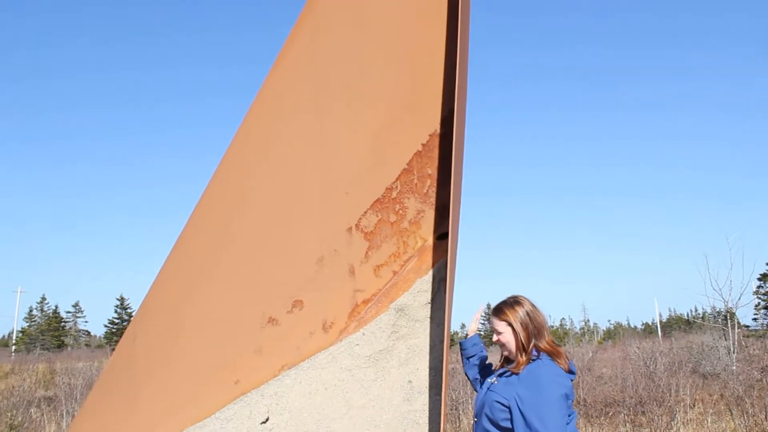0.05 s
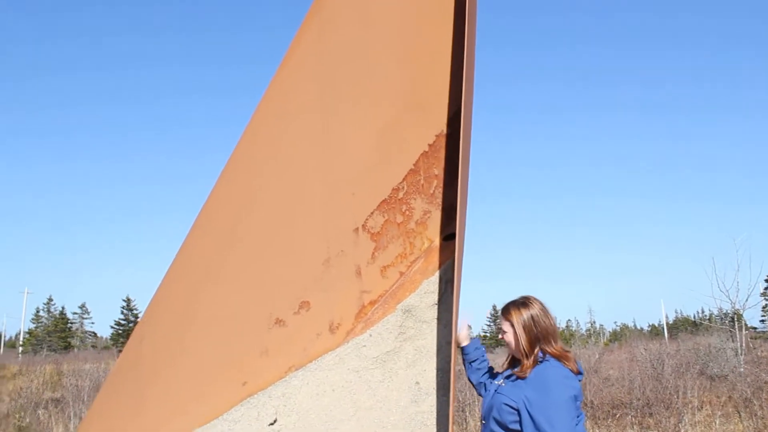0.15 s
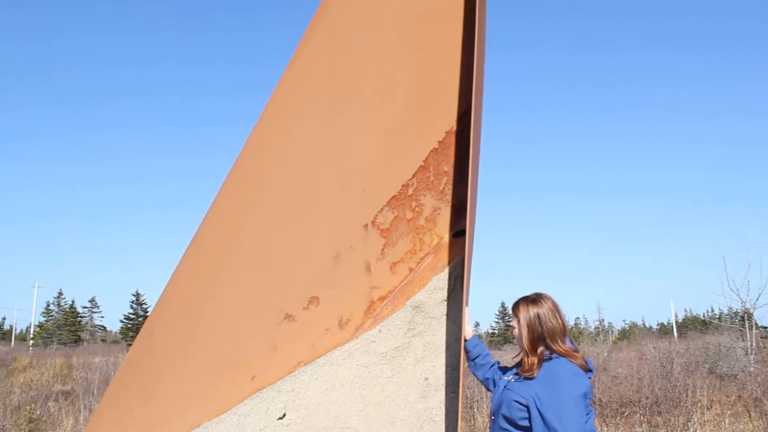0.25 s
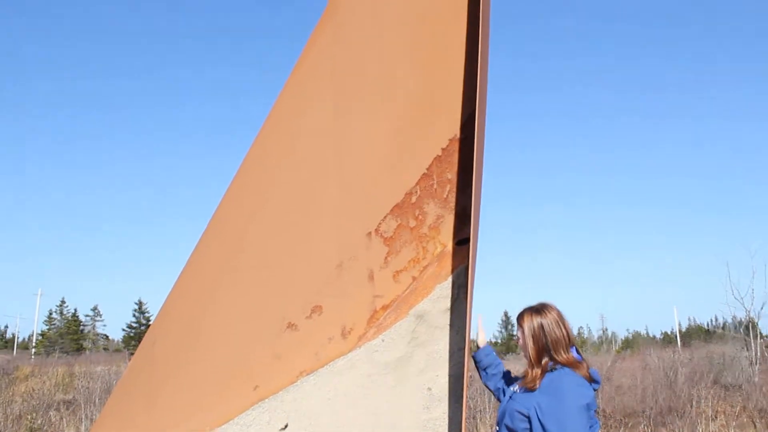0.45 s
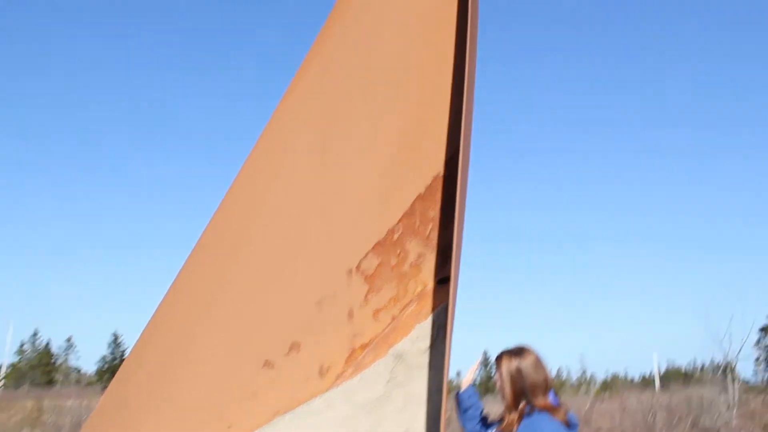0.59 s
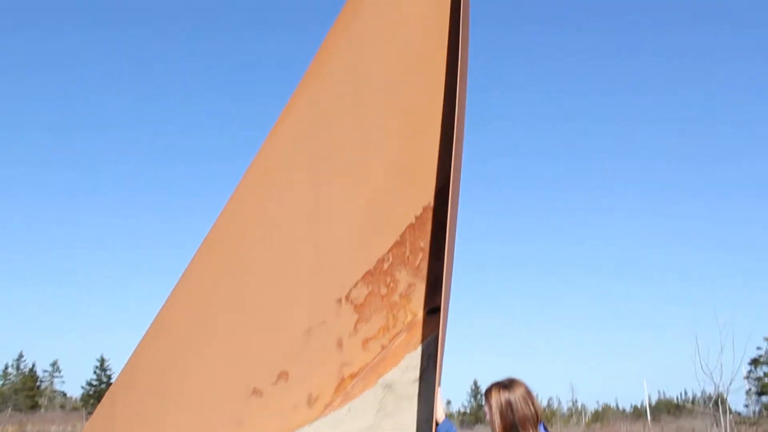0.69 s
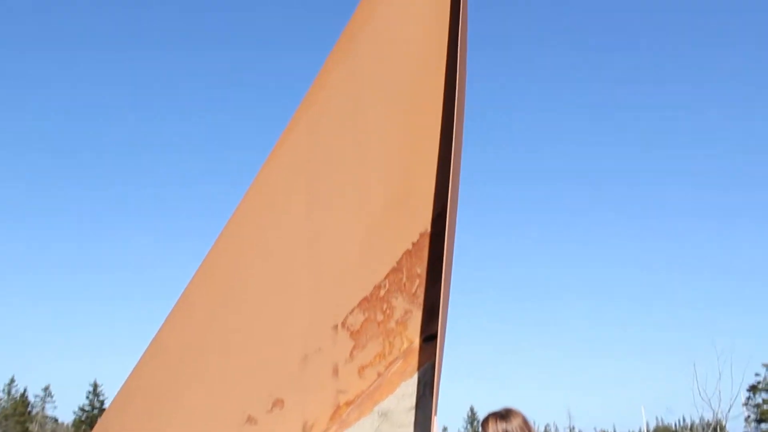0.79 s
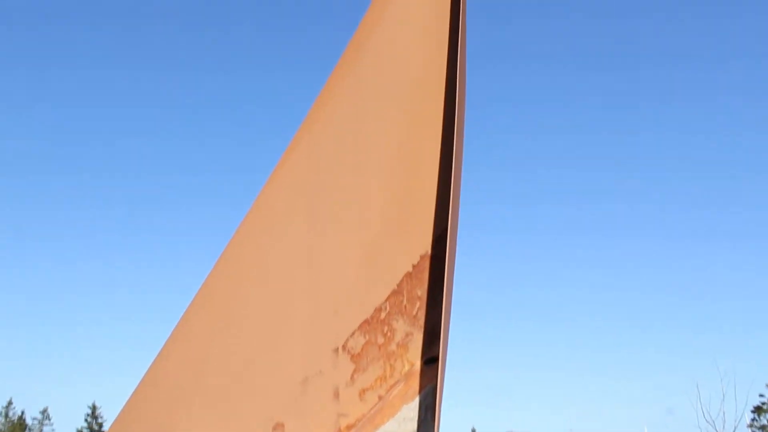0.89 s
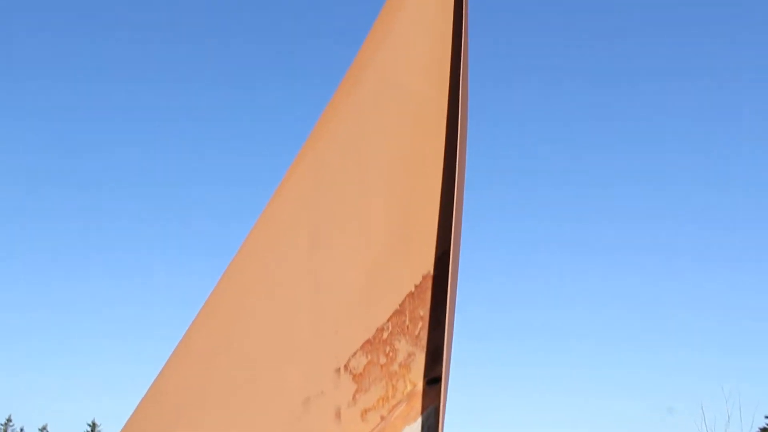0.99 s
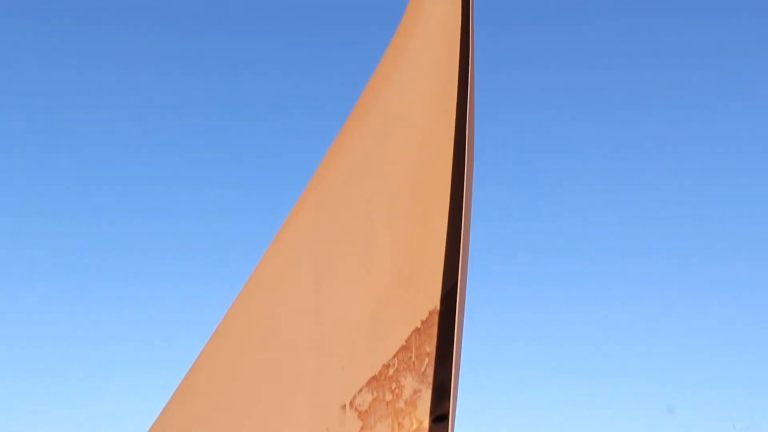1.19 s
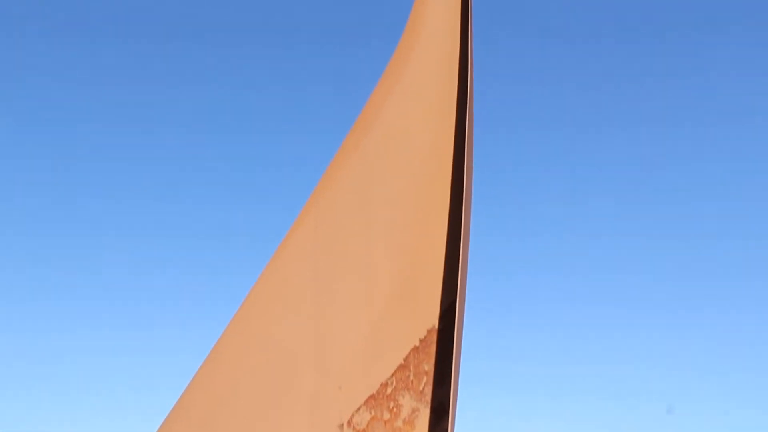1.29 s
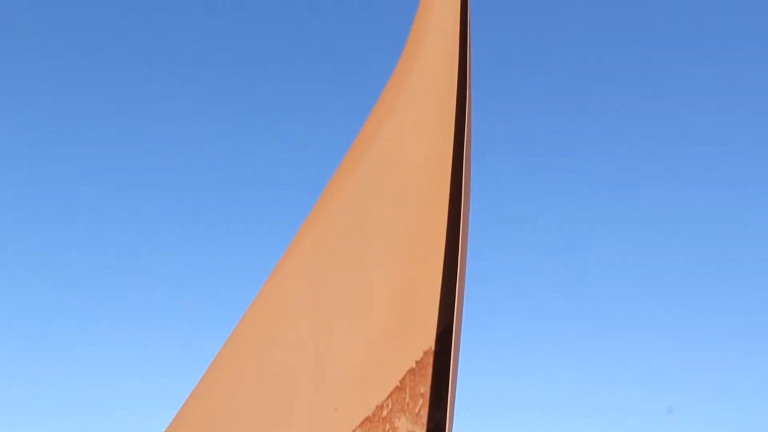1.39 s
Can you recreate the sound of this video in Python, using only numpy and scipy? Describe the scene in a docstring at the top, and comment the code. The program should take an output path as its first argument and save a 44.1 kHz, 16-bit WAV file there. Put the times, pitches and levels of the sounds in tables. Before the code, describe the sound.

A hand knocks three times, evenly, on a tall steel sculpture in an open field. Each close, hard clack is followed by a quick falling pew and a low ring that carries into the next knock, over faint wind.

```python
"""Knocks on a steel sculpture

A hand knocks three times on a tall steel plate in an open field. Each impact is a hard clack,
then a falling 'pew': bending waves are dispersive, so they cross the plate and return treble first.
Later returns blur into a low ring that lasts from knock to knock, over faint wind and hiss."""
import sys
import numpy as np
from scipy import signal
from scipy.fft import rfft, irfft, next_fast_len
from scipy.io import wavfile
from scipy.ndimage import uniform_filter1d

SR = 44100
rng = np.random.default_rng(int(sys.argv[2]) if len(sys.argv) > 2 else 0)


def wrap_up_sound(samples):
    """Save the sound to the file named by the first command line argument, as 16-bit audio."""
    columns = np.atleast_2d(samples).T
    # keep every value between -1 and 1, then stretch to whole-number steps
    tamed = np.clip(columns, -1, 1)
    steps = np.round(tamed * 32767).astype(np.int16)
    wavfile.write(sys.argv[1], SR, steps)


N = 63945
FFT_SIZE = 2 ** 14
HZ = np.fft.rfftfreq(FFT_SIZE, 1 / SR)


# Blows: t/s, clack level/dB, clack treble/dB, low accent f/Hz, gain/dB, high accent f/Hz, gain/dB,
# echo level/dB, sweep level/dB, sweep accent f/Hz, gain/dB, ring level/dB, sweep and ring bass/dB
KNOCK_BLOWS = [(0.2013, 2.5, 1.5, 683, 5, 2930, 12.5, -0.5, 0, 1285, 5, 1.5, 3),
               (0.6929, 1.5, -2, 1435, 7.5, 4020, 2, -4, 0, 198, 5, -1, 1),
               (1.1602, 0, 8.5, 1700, 8.5, 4380, 3.5, -3.5, -4, 1111, 11, -0.5, -5)]

def knocks(mix, treble_hz=6200, bass_hz=246):
    """Impact excitation: each blow gives a clack with echoes, a falling sweep and a ring."""
    for (s, clack_db, treble_db, low_hz, low_db, high_hz, high_db,
         echoes_db, sweep_db, sweep_hz, accent_db, ring_db, bass_db) in KNOCK_BLOWS:
        treble_shelf = treble_db * HZ ** 2 / (HZ ** 2 + treble_hz ** 2)
        bass_shelf = bass_db / (1 + (HZ / bass_hz) ** 2)
        colour_db = accent(low_hz, low_db) + accent(high_hz, high_db) + treble_shelf
        hit = amp(clack_db) * (clack(colour_db) + struck_spot())
        add(mix, s, hit)
        echoes(mix, s, amp(echoes_db) * hit)
        add(mix, s, amp(sweep_db) * sweep(accent(sweep_hz, accent_db) + bass_shelf))
        add(mix, s, amp(ring_db) * ring(bass_shelf))


def accent(hz, db, octaves=.19):
    """Resonance: a spectral peak, in dB, that depends on where the hand lands."""
    return db * np.exp(-.5 * (np.log2((HZ + 1) / hz) / octaves) ** 2)


# Spectrum of the contact: f/Hz, level/dB
CLACK_SPECTRUM = [(30, -5), (150, 17), (450, 10.5), (700, 19.5), (950, 12), (2000, 15.5), (2600, 10.5),
                  (4500, 13.5), (6500, 5.5), (10000, 7), (14500, 3), (16500, -10)]

def clack(colour_db, rise_s=.00093, rattle_s=.0041, rattle_db=-13):
    """Hard contact: a short force has a broad spectrum; a brief rattle follows it."""
    t = np.arange(1024) / SR
    rise = t / rise_s
    contact = (rise * np.exp(1 - rise)) ** 2
    rattle = amp(rattle_db) * np.minimum(rise, 1) * np.exp(-t / rattle_s)
    burst = rfft((contact + rattle) * rng.standard_normal(len(t)), FFT_SIZE)
    burst_db = 10 * np.log10(smooth_power(burst, bins=260))
    return irfft(burst * minimum_phase(read(CLACK_SPECTRUM, HZ) + colour_db - burst_db))


# Modes under the hand: f/Hz, level/dB, T60/s
SPOT_MODES = [(160, -30, .08), (295, -24, 0.08)]

def struck_spot(rise_s=.001):
    """Damped free vibration: the struck spot rings briefly in its modes."""
    t = np.arange(FFT_SIZE) / SR
    modes = sum(amp(db - 60 * t / t60) * np.sin(2 * np.pi * hz * t) for hz, db, t60 in SPOT_MODES)
    return -np.minimum(t / rise_s, 1) * modes


# Groups of paths across the plate: relative length, its spread, level/dB, low-pass f/Hz
PLATE_PATHS = [(.74, .12, -5, 940), (.96, .12, -1, 16000), (1.15, .08, -2.5, 1800),
               (1.5, .25, -13.5, 19000), (2.15, .16, -10.5, 1080)]
# Spectrum of the returning waves: f/Hz, level/dB
SWEEP_SPECTRUM = [(30, -10), (70, 8), (130, 19), (220, 25.5), (380, 19.5), (560, 24), (850, 12.5),
                  (1300, 20), (2400, 12), (4500, 2), (7000, -5.5), (15000, -13.5)]

def sweep(colour_db, count=5, air_delay_s=.004):
    """Dispersion: each path returns the blow as a falling chirp; some paths lose their treble."""
    turns = np.cumsum(travel_time(HZ)) * HZ[1]  # phase is the integral of group delay
    returns = 0
    for length, spread, db, cutoff_hz in PLATE_PATHS:
        lengths = length + spread * (2 * (np.arange(count) + rng.random(count)) / count - 1)
        chirps = sum(np.exp(2j * np.pi * (rng.random() - k * turns - air_delay_s * HZ)) for k in lengths)
        smeared = chirps * scatter()
        ripple = smeared / np.sqrt(smooth_power(smeared, bins=100))
        returns += amp(db) * ripple / np.sqrt(1 + (HZ / cutoff_hz) ** 4)
    return irfft(returns * amp(read(SWEEP_SPECTRUM, HZ) + colour_db))


def travel_time(hz, knee_hz=519.5):
    """Group delay of a round trip, in s: above the knee, wave speed grows as the root of frequency."""
    return .061 * np.sqrt(1000 / (hz + knee_hz))


def scatter(decay_s=.007, db=-2):
    """Scattering: welds and edges smear each return over a few milliseconds."""
    t = np.arange(2048) / SR
    smear = rng.standard_normal(len(t)) * np.exp(-t / decay_s)
    return 1 + amp(db) * rfft(smear / np.linalg.norm(smear), FFT_SIZE)


# Starting spectrum of the ring: f/Hz, relative level/dB
RING_SPECTRUM = [(30, -30), (45, -7), (60, 5.5), (80, 4.5), (100, 1), (130, 9), (190, 6.5), (290, 8),
                 (550, 1), (850, -6), (1200, -10.5), (2000, -18), (4000, -20.5), (8000, -41), (16000, -49)]
# Reverberation time of the plate: f/Hz, T60/s
RING_DECAY = [(60, 5.5), (130, 3.24), (250, 0.98), (500, 0.67), (1000, 0.77), (2000, 0.51), (4000, 0.48),
              (12000, .5)]

def ring(colour_db, db=-18, rise_s=.015, release_s=.2):
    """Reverberation: countless later returns form a diffuse field whose lowest modes last longest."""
    hz, t, noise = signal.stft(rng.standard_normal(N), SR, nperseg=512)
    age = np.maximum(t - travel_time(hz)[:, None], 0)
    envelope = np.minimum(age / rise_s, 1) * amp(-60 * age / read(RING_DECAY, hz)[:, None])
    release = np.minimum((t[-1] - t) / release_s, 1)
    tail = signal.istft(noise * envelope * release, SR, nperseg=512)[1]
    return coloured(tail, db + read(RING_SPECTRUM, HZ) + colour_db)


# Reflections: delay t/s, relative level/dB, centre f/Hz
REFLECTIONS = [(0.0122, -12.5, 3560), (0.0762, -26, 3520)]

def echoes(mix, s, hit):
    """Reflection: the clack returns from the ground and from afar, weaker and narrower in band."""
    for delay, db, centre_hz in REFLECTIONS:
        add(mix, s + delay, amp(db) * band_pass(hit, centre_hz))


# Touch before the third knock: t/s, level/dB, centre f/Hz
HAND_TOUCH = (1.1125, -18.5, 1740)

def touch(mix):
    """Light contact: the hand makes a weak, midrange clack."""
    s, db, centre_hz = HAND_TOUCH
    add(mix, s, amp(db) * band_pass(clack(0), centre_hz))


# Blow before the scene opens: t/s, ring level/dB
EARLIER_BLOW = (-0.71, 3.4)

def lingering_ring(mix):
    """Free decay: the plate still rings from an earlier knock."""
    s, db = EARLIER_BLOW
    add(mix, s, amp(db) * ring(0))


# Spectrum of wind and hiss: f/Hz, level/dB
WIND_SPECTRUM = [(20, -48), (100, -25), (300, -37.5), (700, -40), (1500, -47), (3000, -53), (6000, -57.5),
                 (12000, -61.5), (16000, -63.5)]

def wind():
    """Stationary noise: faint wind and hiss, strongest in the bass."""
    return coloured(rng.standard_normal(N), read(WIND_SPECTRUM, HZ))


def amp(db):
    """Decibels to amplitude ratio."""
    return 10 ** (np.asarray(db) / 20)


def read(points, hz):
    """Interpolation of a table on a log-frequency axis."""
    f, value = np.transpose(points)
    return np.interp(np.log(hz + 1), np.log(f + 1), value)


def add(mix, s, sound):
    """Superposition of a sound at time s, which may be negative."""
    at = round(s * SR)
    sound = sound[max(-at, 0):]
    part = mix[max(at, 0):][:len(sound)]
    part += sound[:len(part)]


def smooth_power(spectrum, bins):
    """Spectral envelope: power averaged over neighbouring bins."""
    return abs(uniform_filter1d(abs(spectrum) ** 2, bins)) + 1e-12


def minimum_phase(db):
    """Causal filter: its phase follows from its log gain by the Hilbert transform."""
    log_gain = np.log(amp(np.concatenate([db, db[-2:0:-1]])))
    return np.exp(np.conj(signal.hilbert(log_gain)))[:len(HZ)]


def band_pass(x, hz):
    """Broad band-pass: weak or far sounds keep only their middle."""
    ratio = 1j * HZ / hz
    return irfft(rfft(x) * (2 * ratio / (1 + ratio) ** 2) ** 2)


def coloured(x, db):
    """Zero-phase filtering by a gain at each frequency."""
    size = next_fast_len(len(x), real=True)
    gain = np.interp(np.fft.rfftfreq(size, 1 / SR), HZ, amp(db))
    return irfft(rfft(x, size) * gain, size)[:len(x)]


def scene():
    """Superposition: the plate's sounds and the wind add in one channel."""
    mix = wind()
    lingering_ring(mix)
    touch(mix)
    knocks(mix)
    return mix[None]


def record(dry, cutoff_hz=15900):
    """Clipping and band limiting: the clacks just overload, then a low-pass follows."""
    low_pass = signal.firwin(301, cutoff_hz, window=("kaiser", 11), fs=SR)
    return signal.oaconvolve(np.clip(dry, -1, 1), low_pass[None], "same")


dry = scene()
out = record(dry)
wrap_up_sound(out)
```